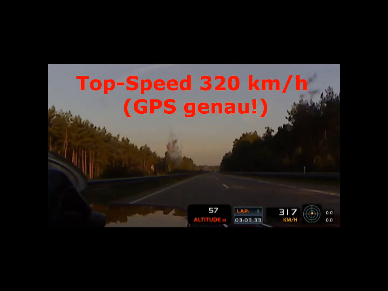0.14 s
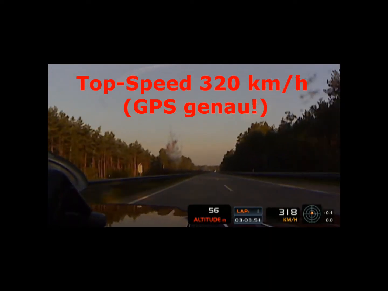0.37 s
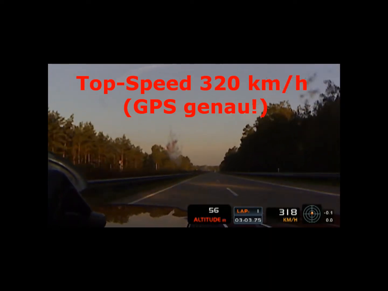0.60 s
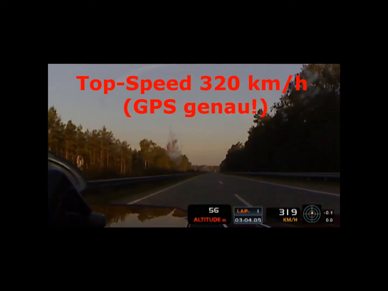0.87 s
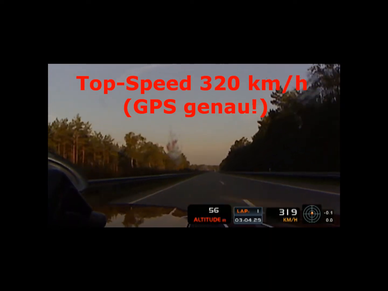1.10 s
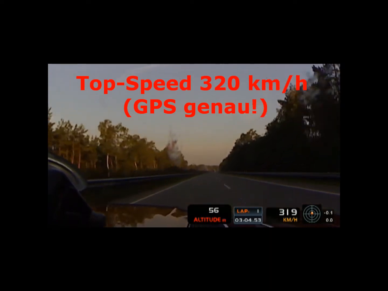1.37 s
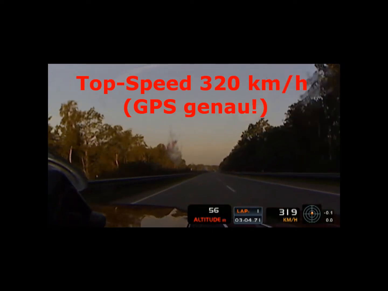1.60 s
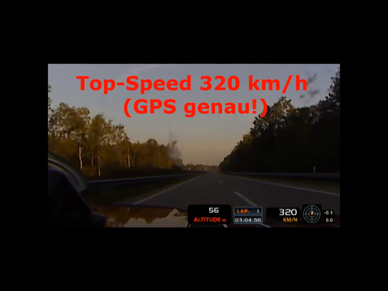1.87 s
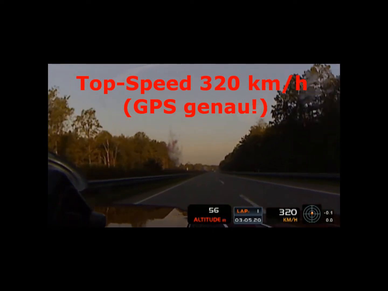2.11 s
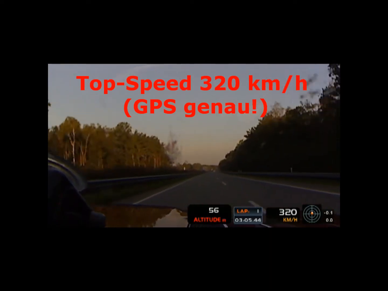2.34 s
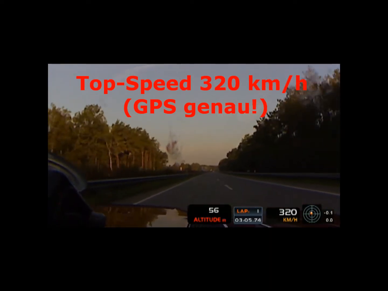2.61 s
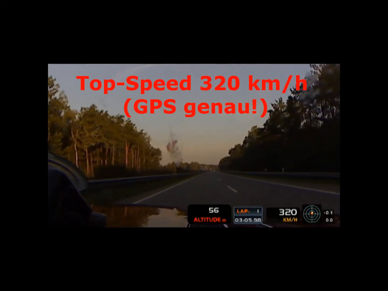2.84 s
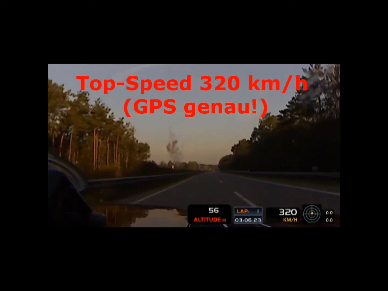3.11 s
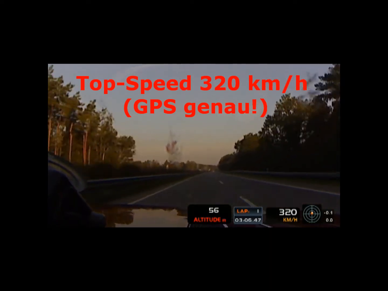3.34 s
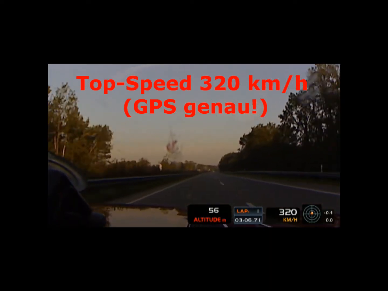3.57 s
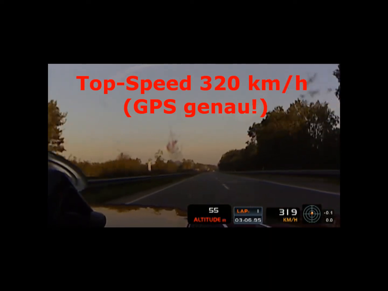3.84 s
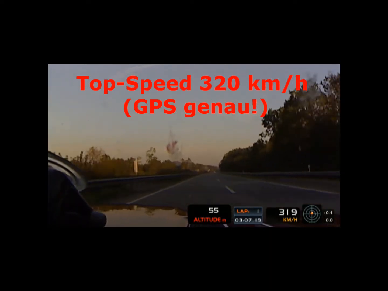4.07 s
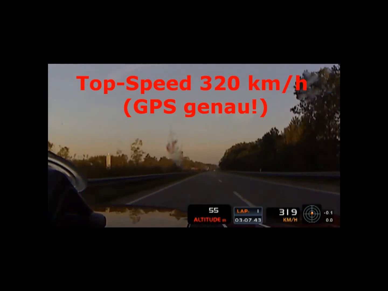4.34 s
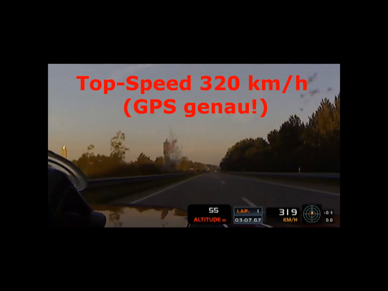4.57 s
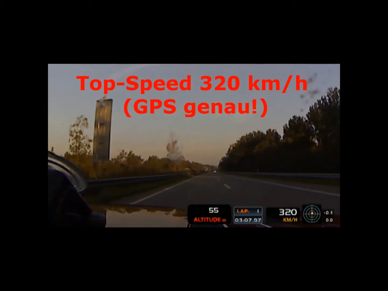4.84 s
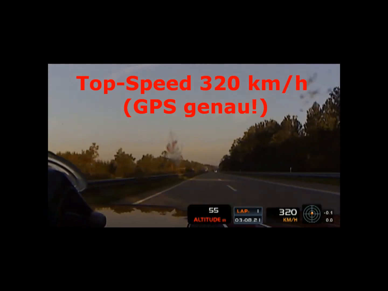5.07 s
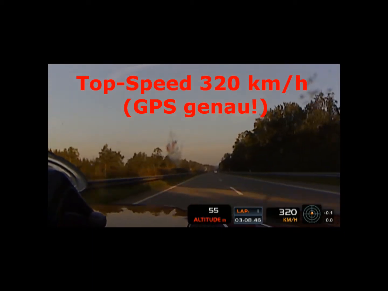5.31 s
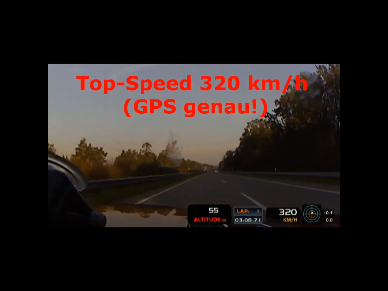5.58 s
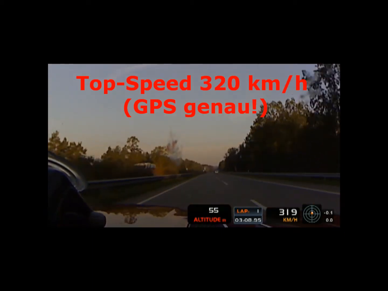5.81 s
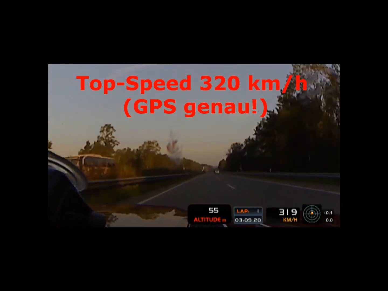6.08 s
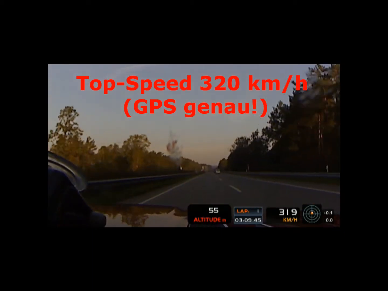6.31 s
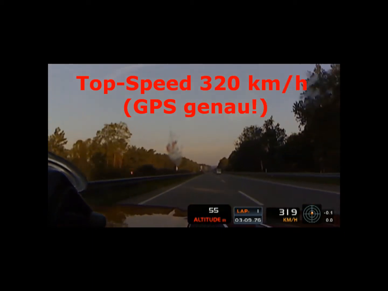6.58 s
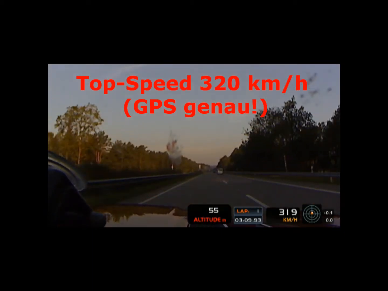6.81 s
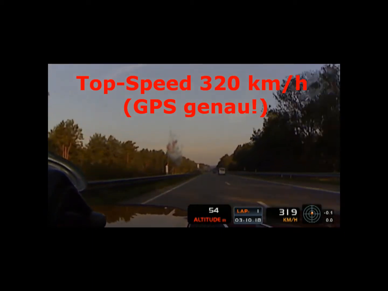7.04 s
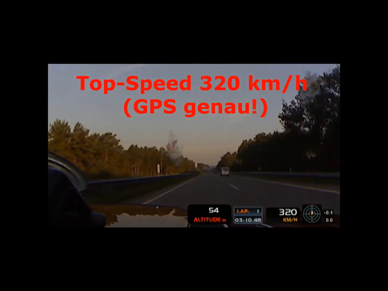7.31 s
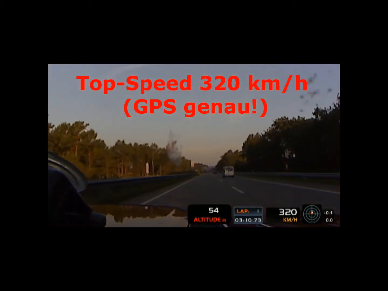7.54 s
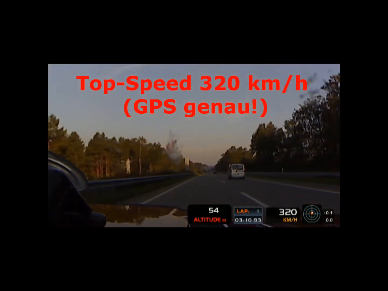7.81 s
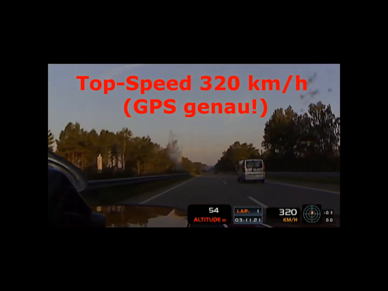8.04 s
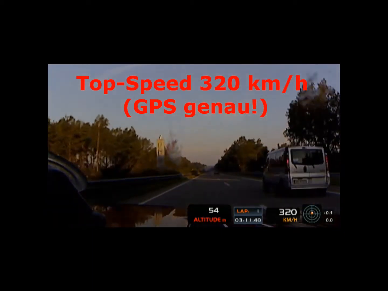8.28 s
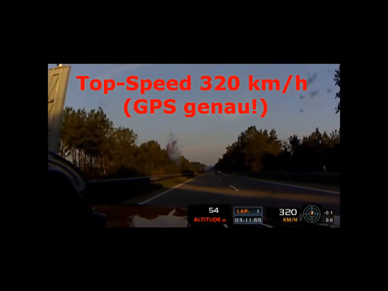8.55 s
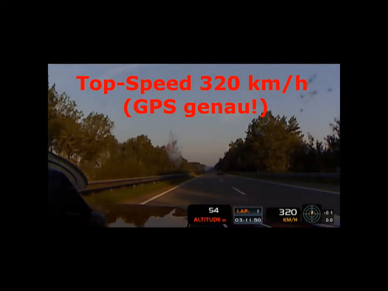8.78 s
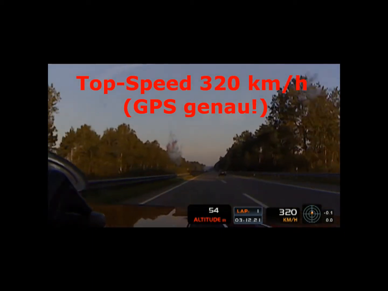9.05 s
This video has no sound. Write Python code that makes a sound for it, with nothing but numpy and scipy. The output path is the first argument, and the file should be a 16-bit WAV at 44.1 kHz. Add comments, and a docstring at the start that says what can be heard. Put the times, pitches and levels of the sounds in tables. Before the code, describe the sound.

A small microphone in a car cabin picks up an unwavering motor hum and dense low-frequency rumble at top speed. Hard plastic panels buzz and clatter almost continuously for the opening seconds, then more sparsely, with a violent cluster halfway through and intermittent rattles after. Sudden pressure thumps from bumps and gusts clip harshly. The speed never changes.

```python
"""Inside a car held at top speed: engine drone, wheel shake and wind-and-road roar run throughout.
Loose plastic trim chatters thickly for the first 2.4 s, bursts hardest near 4.4-4.6 s, then rattles in short bursts.
Pressure thumps fall between 0.1 and 8.5 s. Sources: crank-order tones, struck panel resonances,
soft-edged pressure steps, wheel-rate tones, coloured noise. The small microphone's stage overloads and recovers
through a coupling capacitor; then the converter clips."""
import sys
import numpy as np
from scipy import signal
from scipy.fft import rfft, irfft
from scipy.io import wavfile
from scipy.ndimage import uniform_filter1d

SR = 44100
rng = np.random.default_rng(int(sys.argv[2]) if len(sys.argv) > 2 else 0)


def makeup_ratio(level_db):
    """Linear amplitude ratio for a level in decibels (20 dB per factor of ten)."""
    decades = np.asarray(level_db, float) / 20
    return 10 ** decades


def bounce(signal):
    """Save signal as a 16-bit WAV file at the path given by the first command-line argument."""
    frames = np.transpose(np.atleast_2d(signal))
    limited = np.clip(frames, -1, 1)
    pcm = np.round(limited * 32767).astype(np.int16)
    wavfile.write(sys.argv[1], SR, pcm)


N = 403956  # samples


def rms_one(x):
    """Scale to unit rms."""
    return x / np.sqrt(np.mean(x ** 2) + 1e-20)


def in_time(rows):
    """Interpolate each column after the time column to one value per sample."""
    time_s, *columns = np.transpose(rows)
    return [np.interp(np.arange(N) / SR, time_s, column) for column in columns]


def drift(rate_hz):
    """Slow random wander of unit rms: noise through a double one-pole low-pass, run in for 1 s."""
    r = np.exp(-2 * np.pi * rate_hz / SR)
    noise = rng.standard_normal(N + SR)
    return rms_one(signal.lfilter([1], [1, -2 * r, r * r], noise)[SR:])


def resonance(x, hz, width_hz):
    """Two-pole resonance of about unit peak gain."""
    r = np.exp(-np.pi * width_hz / SR)
    zeros = np.array([1, 0, -1]) * (1 - r * r) / 2
    poles = [1, -2 * r * np.cos(2 * np.pi * hz / SR), r * r]
    return signal.lfilter(zeros, poles, x)


# Engine speed and strength: (time [s], firing rate [Hz], relative level [dB])
ENGINE_RUN = [(0, 432.5, -29.5), (1.2, 434.8, -32), (2.9, 434.8, -29.5), (3.2, 433.3, -30.5),
              (4.4, 433.2, -29), (5, 434.5, -31), (6.5, 434.2, -29.5), (7.8, 433.2, -30.5),
              (9.16, 435, -28.5)]
# Engine orders: (multiple of crank speed, relative level [dB])
ENGINE_ORDERS = [(.75, -1.5), (1.5, -0.5), (2.5, -6), (2.75, -3), (3, -3.5), (4, 0.5), (4.5, -6.5),
                 (5.5, -21)]


def engine():
    """Eight cylinders: crank orders as tones; uneven burning wavers each in level and phase."""
    firings_per_turn = 4
    firing_hz, tone_db = in_time(ENGINE_RUN)
    crank_rad = 2 * np.pi * np.cumsum(firing_hz / firings_per_turn) / SR
    drone = 0
    for multiple, order_db in ENGINE_ORDERS:
        phase_rad = multiple * crank_rad + 2 * np.pi * rng.random() + 0.052 * drift(7.7)
        level_db = tone_db + order_db + 3.5 + 1.2 * drift(8.0)
        drone = drone + makeup_ratio(level_db) * np.sin(phase_rad)
    return drone


def shaking(calm_db, knocks):
    """Buzz level [dB]: calm level plus a spell of shaking that swells before each knock and dies after."""
    rise_s, fall_s, spell_db = 0.005, 0.01, -20  # spell_db is against the knock
    rise, fall = np.exp(-1 / (rise_s * SR)), np.exp(-1 / (fall_s * SR))
    power = knocks ** 2 + 1e-18
    after = signal.lfilter([1], [1, -fall], power)
    before = signal.lfilter([0, rise], [1, -rise], power[::-1])[::-1]  # run backwards in time
    return 10 * np.log10(makeup_ratio(calm_db) ** 2 + makeup_ratio(spell_db) ** 2 * (after + before))


def bursts(starts, rise_s, fall_s):
    """Each contact is a flurry of micro-impacts: noise under a quick rise and fall."""
    rise, fall = np.exp(-1 / (rise_s * SR)), np.exp(-1 / (fall_s * SR))
    decaying = signal.lfilter([1], [1, -fall], starts + 1e-18)
    envelope = signal.lfilter([1 - rise], [1, -rise], decaying)
    return envelope * rng.standard_normal(N)


# Strongest trim contacts: (time [s], relative peak level [dB], treble against body [relative dB])
TRIM_KNOCKS = [(0.066, -29, -6), (0.0803, -35, -15), (0.087, -31.0, -1), (0.1192, -35, -8), (0.131, -37, 0),
               (0.141, -30, -19.5), (0.1509, -30.5, -5), (0.2055, -27.5, -8), (0.2183, -30, -23),
               (0.2282, -23, -11), (0.2414, -29.5, -12), (0.2533, -29, -17), (0.3667, -23.5, -14),
               (0.378, -29, -10), (0.416, -25, -10), (0.5227, -24, -9), (0.606, -27, -20),
               (0.616, -23.5, -9), (0.689, -32, -9), (0.711, -30, -5), (0.7287, -31.5, -15),
               (0.794, -24.5, -9), (0.8734, -35, -16), (0.879, -30, -5), (0.9126, -24.5, -12),
               (0.937, -31.5, -11), (1.104, -31.5, -7), (1.1147, -34.5, 9), (1.125, -29.5, -5),
               (1.1328, -24.5, -9), (1.1543, -28, -1), (1.2299, -21.5, -14), (1.2391, -28, -6),
               (1.253, -31.5, -5), (1.2633, -34.5, -12), (1.3007, -27, -2), (1.3106, -29, -13),
               (1.344, -27.5, -13), (1.3515, -27.5, -3), (1.4001, -26, -7), (1.423, -30.5, -5.5),
               (1.441, -25.5, -18), (1.4506, -23, -4), (1.4645, -29, -8), (1.554, -31, -12),
               (1.567, -28.5, -14), (1.639, -33, -11), (1.6466, -29, -1), (1.674, -28, -5),
               (1.6798, -26, -18), (1.6927, -21.5, -5), (1.7109, -27, 0), (1.7365, -23, -14),
               (1.7447, -21, -7), (1.7552, -26, -9), (1.7682, -17.5, -14), (1.812, -30.5, -6),
               (1.844, -30.5, -21), (1.8544, -33, -19), (1.8625, -24, -5), (1.928, -25.5, -14),
               (1.938, -24, -2), (2.011, -24, -11), (2.0558, -27, -8), (2.0664, -33, -6.5),
               (2.2833, -21, -13), (2.3701, -27.5, -10), (2.3783, -29.5, -9), (2.5655, -31.5, -12),
               (2.6965, -29, -12.5), (3.2467, -27, -7.5), (3.3046, -26, -10), (3.3776, -27.5, -13),
               (3.4997, -28, -8), (3.5074, -25.5, -6), (3.5175, -27, -8), (3.5254, -33, -7),
               (3.6183, -30, -8), (3.6942, -29.0, -7), (3.939, -28.5, -11), (3.9557, -27.5, -3.5),
               (3.9878, -26.5, -7), (3.9962, -35, 2), (4.0333, -32.5, -18), (4.0744, -27.5, -12),
               (4.1987, -25.5, -14), (4.2108, -33, -9), (4.274, -24.5, -12.5), (4.281, -30.0, -14),
               (4.377, -26.5, -15), (4.4003, -23, -7), (4.4073, -16.5, -11), (4.4166, -21, -2),
               (4.4238, -25, -13), (4.4316, -24, -11), (4.436, -9.5, -16), (4.4454, -12, -13),
               (4.4589, -31.5, -10), (4.4642, -23, -11), (4.4756, -30.5, -14.5), (4.4822, -28.5, -15),
               (4.4976, -25.5, -15), (4.5035, -26.5, -15), (4.5092, -18.5, -7), (4.5344, -17, -7),
               (4.5408, -24, -21), (4.5557, -12, -9), (4.5637, -14.5, -3), (4.571, -12.5, -9),
               (4.5778, -26, -21), (4.584, -26.5, -5), (4.6003, -31, -11), (4.6084, -30, -5),
               (4.6275, -21, -18), (4.6377, -26, -10), (4.934, -31.0, -15.5), (4.963, -33, -16),
               (4.9727, -35, -14), (4.981, -29, -6), (5.0545, -31.0, -16), (5.1998, -30.0, -19),
               (5.3855, -28.5, -10.5), (5.393, -31.5, -11), (5.4006, -31, -8), (5.4102, -27, -9),
               (5.4375, -31, -17), (5.4701, -31, -3), (5.4788, -27, -7), (5.491, -36, -16),
               (5.5326, -31.0, -10), (5.5823, -34, -5), (5.6335, -32.5, -15), (5.6968, -25.5, -11.5),
               (5.8049, -25.0, -8), (5.8586, -33, -6), (5.8648, -29.5, -18), (5.87, -31, -13),
               (5.876, -27.5, -13), (5.8854, -32.5, -7), (6.005, -30, -14), (6.016, -27.5, -7),
               (6.0236, -31.5, -17), (6.262, -25, -16), (6.3196, -26.5, -15), (6.3565, -24.5, -4),
               (6.3928, -29, -12), (6.4076, -31, -8), (6.4177, -24.5, -17), (6.4548, -27.5, -16),
               (6.4644, -28, -2.5), (6.647, -26.5, -10), (6.6536, -26.5, -8), (6.6635, -24.5, -9),
               (6.6842, -32.5, -16), (6.7236, -26.5, -11), (6.795, -33, -19), (6.8554, -27, -15),
               (6.9225, -20.5, -13), (6.9311, -18.5, -8), (6.9385, -25, -13), (6.945, -28, -17),
               (7.1246, -23, -14), (7.1426, -28.5, -18), (7.2867, -28.5, -12), (7.311, -30, -8),
               (7.3331, -28, -18), (7.3567, -26, -17), (7.5372, -34, -10), (7.6272, -30, -11),
               (7.6507, -28, -11), (7.805, -32.5, -18), (7.845, -26.5, -12), (7.8509, -21, -14),
               (8.036, -27.5, -12), (8.1807, -31, -5), (8.3408, -27.5, -15), (8.6755, -36, -18),
               (8.7236, -30.5, -3), (8.771, -27.5, -6), (8.7775, -31, -16), (8.8261, -22.5, -24),
               (8.8363, -33, -26), (8.8427, -30, -14), (8.85, -29.0, -19), (8.8583, -28.5, -10),
               (8.8666, -29.5, -4), (8.873, -26, -18), (8.8837, -20, -13), (8.8975, -29.5, -9),
               (9.0109, -24.5, -11), (9.046, -27.5, -21), (9.086, -32.5, -10), (9.0916, -24.5, -17),
               (9.1077, -29.5, -8), (9.1144, -26, -15)]
# Panel resonances: (frequency [Hz], width [Hz], level [dB])
TRIM_MODES = [(1300, 100, -3), (1794, 168, -0.5), (2503, 250, -2.5), (2890, 335, -0.5), (3340, 234, 1),
              (3797, 360, -6), (4350, 900, -11.5), (5375, 630, -11.5), (7100, 1900, -22.5)]
# A second, duller loose part joins in: (time [s], level of the low modes [dB])
DULL_PART = [(0, -1), (2, -3.5), (3, 5), (4.5, -1.5), (5.5, 2), (9.16, 0.5)]


def trim(calm_db, turn_rad):
    """Strong knocks and weak chatter, thrown in step with the wheel shake, ring one panel."""
    low_under_hz, treble_from_hz = 2100, 4200
    base_rate_per_s, chatter_db, chatter_top_db = 260, 16, -45.5  # rate, size over buzz, buzz ceiling

    time_s, peak_db, treble_db = np.transpose(TRIM_KNOCKS)
    at = np.minimum((time_s * SR).astype(int), N - 1)
    knocks = np.zeros(N)
    knocks[at] = makeup_ratio(peak_db)
    buzz_db = shaking(calm_db, knocks)
    dull_db = in_time(DULL_PART)[0]

    rate_db = 2.9 * np.cos(turn_rad) + 3.3 * np.cos(2 * turn_rad) + 3.0 * drift(8.0)
    per_s = base_rate_per_s * makeup_ratio(rate_db)
    spread_db = 2.98 * np.minimum(rng.exponential(1, N), 2.3)
    sizes = makeup_ratio(np.minimum(buzz_db, chatter_top_db) + chatter_db + spread_db)
    chatter = sizes * (rng.random(N) < per_s / SR)

    body = chatter + makeup_ratio(13.0) * knocks
    # the duller part takes the edge off the chatter
    treble = chatter * makeup_ratio(1.0 - 1.1 * dull_db + 4.0 * rng.standard_normal(N))
    treble[at] += makeup_ratio(peak_db + treble_db + 27.0)

    # uneven fizz between contacts
    fizz = makeup_ratio(buzz_db - 2.5 + 1.6 * drift(60.0)) * rng.standard_normal(N)
    middle = bursts(body, rise_s=.0004, fall_s=.0019) + fizz
    high = bursts(treble, rise_s=.0004, fall_s=.001) + fizz
    low = middle * makeup_ratio(dull_db)

    rattle = 0
    for k, (hz, width_hz, mode_db) in enumerate(TRIM_MODES):
        drive = low if hz < low_under_hz else middle if hz < treble_from_hz else high
        rattle = rattle + (-1) ** k * makeup_ratio(mode_db) * resonance(drive, hz, width_hz)
    return rattle


# Bumps and gusts: (start [s], length [ms], signed pressure step [linear])
PRESSURE_THUMPS = [(0.115, 4, 0.47), (1.0039, 3.9, 0.47), (1.425, 4.1, 0.46), (1.477, 5.5, 0.53),
                   (1.787, 3.7, -0.17), (3.139, 7.6, 0.4), (4.1162, 5.8, -0.53), (4.2165, 4.3, -0.32),
                   (4.499, 4.9, -0.68), (4.515, 9.4, 0.52), (4.603, 4.7, -0.7), (4.618, 4.5, 0.45),
                   (5.6121, 5.3, 0.7), (5.6291, 3.3, -0.75), (6.8077, 4, 0.57), (6.8149, 6.67, 0.7),
                   (8.327, 2.5, 0.95), (8.535, 4.6, -0.7)]


def thumps():
    """Each bump or gust holds the pressure off rest for its length, with soft edges."""
    steps = np.zeros(N)
    for start_s, length_ms, pressure in PRESSURE_THUMPS:
        steps[int(start_s * SR):int((start_s + length_ms / 1000) * SR)] += pressure
    edge = int(.0016 * SR)
    return uniform_filter1d(uniform_filter1d(steps, size=edge), size=edge)


# Wheel unbalance: (multiple of wheel speed, relative level [dB])
WHEEL_ORDERS = [(1, -8), (3, -19.5), (4, -14.5)]


def wheels(rumble_db):
    """Unbalance shakes the body once a turn; wheels slip against each other, so the tones blur."""
    mean_wheel_hz = 40.96
    turn_rad = 2 * np.pi * mean_wheel_hz * np.arange(N) / SR + .8 * drift(1.5)
    shake = 0
    for multiple, order_db in WHEEL_ORDERS:
        level = makeup_ratio(order_db + 2.2 * drift(4.5))
        shake = shake + level * np.sin(multiple * turn_rad + 0.62 * drift(2.93))
    return makeup_ratio(rumble_db + 3.0) * shake, turn_rad


# Wind and road colour in the cabin: (frequency [Hz], relative spectral level [dB])
ROAR_COLOUR = [(12, 0), (25, 5), (45, 1.5), (60, -2), (80, 2.5), (130, -2.5), (170, -2.5), (200, -8.5),
               (235, -6), (320, -9.5), (420, -12), (550, -21.5), (800, -42.5), (1500, -42), (4000, -64)]


def roar(rumble_db):
    """Turbulence and tyres: noise in the cabin's colour, in gusty lumps."""
    hz = np.maximum(np.arange(N // 2 + 1) * SR / N, 1)
    colour_hz, colour_db = np.transpose(ROAR_COLOUR)
    colour = makeup_ratio(np.interp(np.log(hz), np.log(colour_hz), colour_db, left=-60))
    noise = rms_one(irfft(rfft(rng.standard_normal(N)) * colour, N))
    return makeup_ratio(rumble_db + 4.0 + 0.69 * drift(11.0)) * noise


# How hard the road shakes the car: (time [s], relative rumble level [dB], relative calm trim buzz level [dB])
ROAD_RIDE = [(0.05, -18, -44.5), (0.63, -17.5, -47.5), (1.54, -18.5, -49.5), (2.42, -19, -53.5),
             (3.33, -18.5, -54), (4.34, -18.5, -46.5), (4.49, -17, -49), (4.67, -17, -53),
             (4.97, -19, -53.5), (5.68, -18.5, -45.5), (5.99, -19, -53.5), (6.29, -18, -56.5),
             (6.54, -18.5, -48), (7.15, -17.5, -53), (7.68, -18.5, -49), (8.16, -19, -55),
             (8.69, -18, -47.5), (9.12, -19, -54)]


def scene():
    """All pressures add at one microphone in the cabin."""
    rumble_db, buzz_db = in_time(ROAD_RIDE)
    shake, turn_rad = wheels(rumble_db)
    mix = engine() + trim(buzz_db, turn_rad) + thumps() + shake + roar(rumble_db)
    return mix[None]


def top_cut(x):
    """Nothing passes above the cut-off."""
    return signal.sosfilt(signal.butter(12, 15850, fs=SR, output="sos"), x)


def record(dry):
    """Flat tops at the first stage sag back through the capacitor; the converter clips and band-limits."""
    coupling_hz, band_edge_hz = 58.3, 7040
    stage_top, converter_top, full_scale = 0.3397, .2495, .2512  # linear amplitude
    r = np.exp(-2 * np.pi * coupling_hz / SR)
    saturated = np.clip(dry, -stage_top, stage_top)
    coupled = signal.lfilter([1, -1], [1, -r], saturated)
    clipped = np.clip(coupled, -converter_top, converter_top)
    band_limit = signal.cheby1(N=10, rp=.02, Wn=band_edge_hz, fs=SR, output="sos")
    narrow = signal.sosfilt(band_limit, clipped)
    capped = np.clip(narrow, -full_scale, full_scale)  # cutting the filter's overshoot sprays treble
    hiss = makeup_ratio(-91.5) * rng.standard_normal(dry.shape)
    return top_cut(capped + hiss)


dry = scene()
out = record(dry)
bounce(out)
```